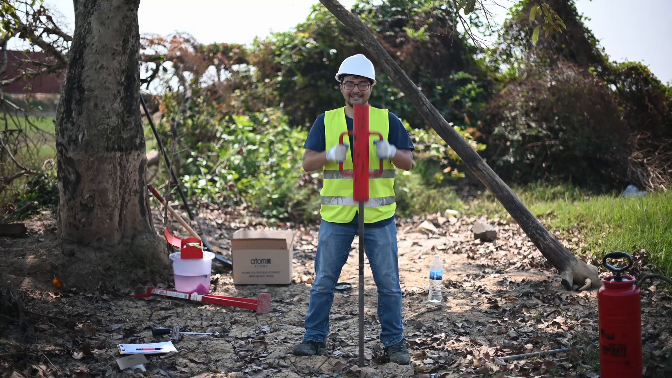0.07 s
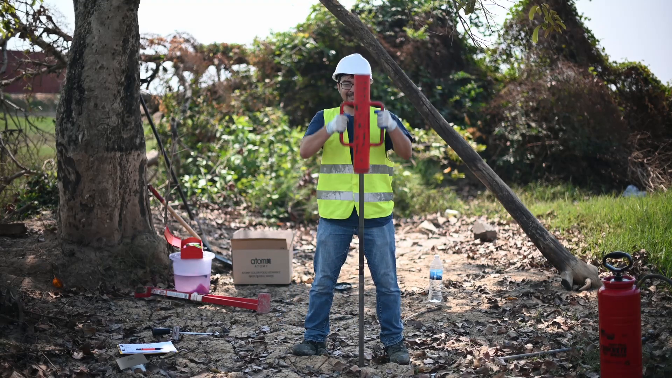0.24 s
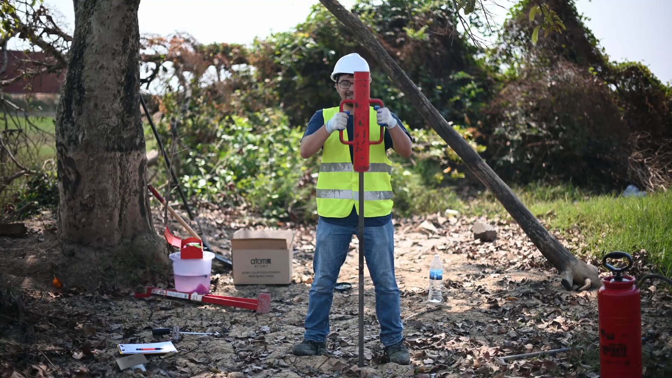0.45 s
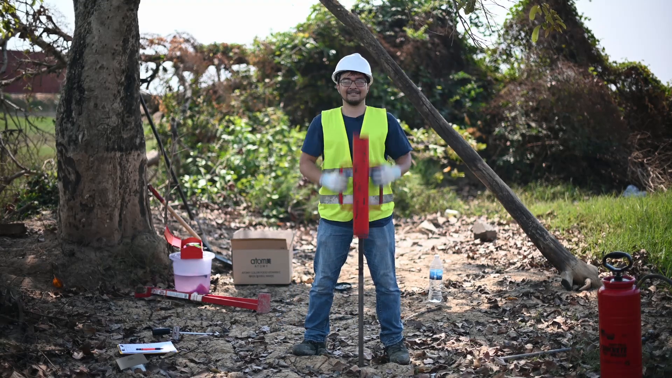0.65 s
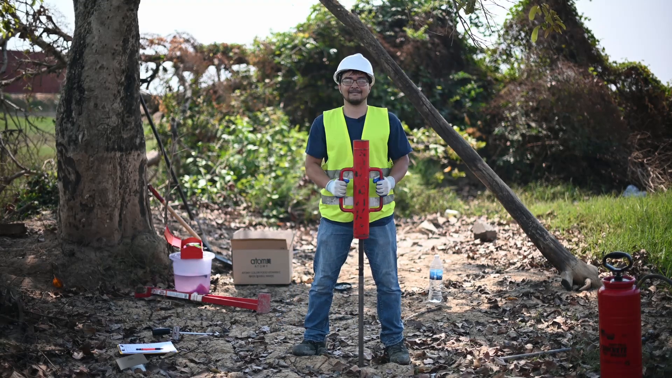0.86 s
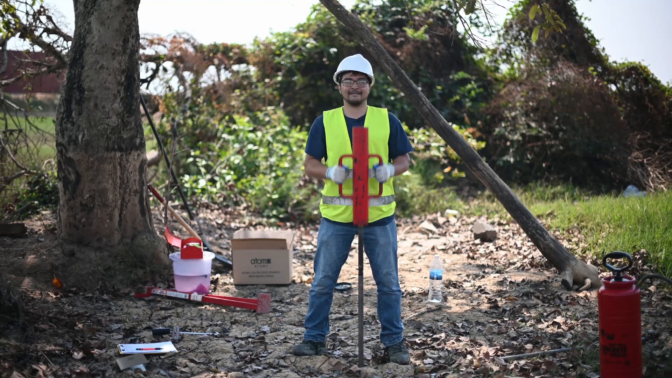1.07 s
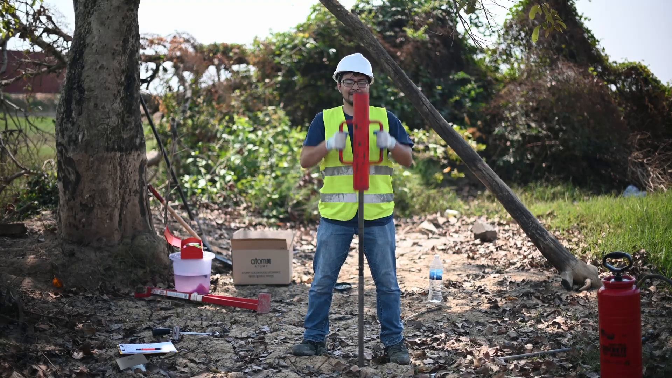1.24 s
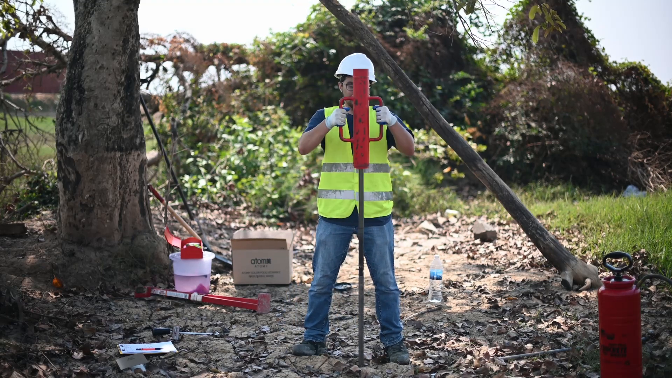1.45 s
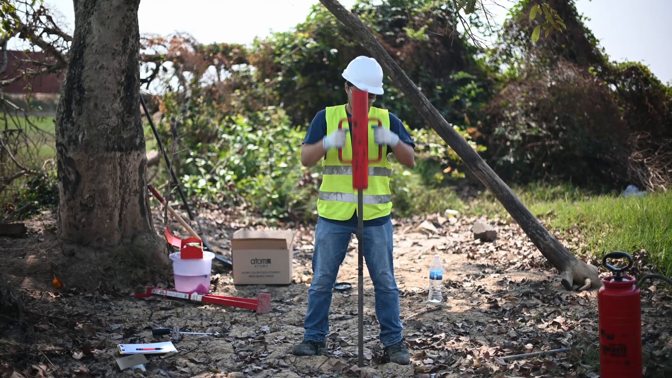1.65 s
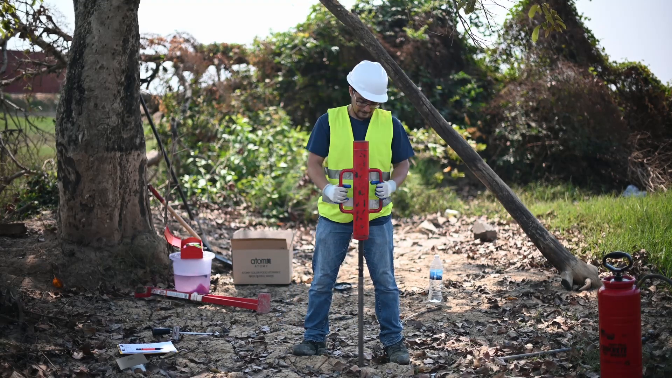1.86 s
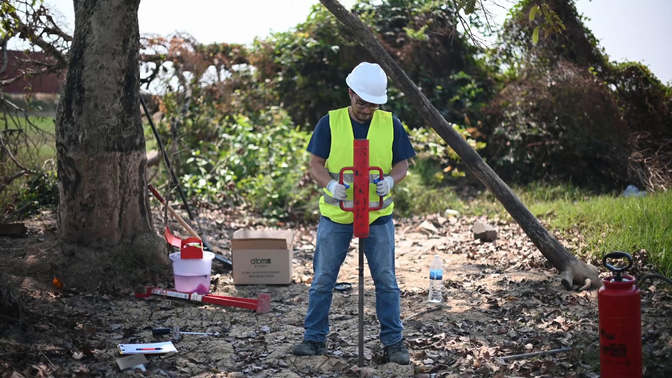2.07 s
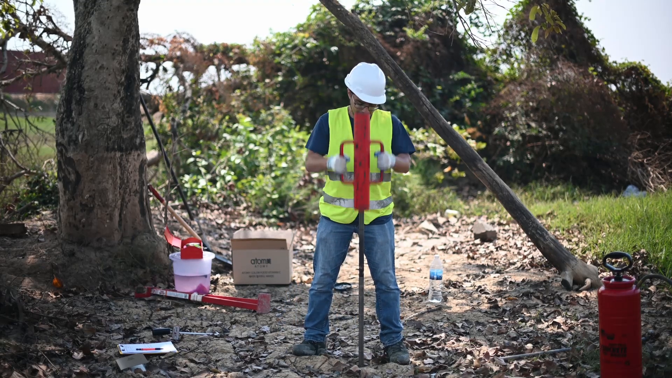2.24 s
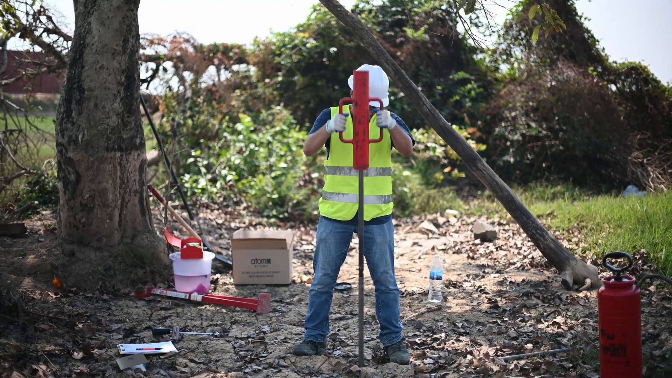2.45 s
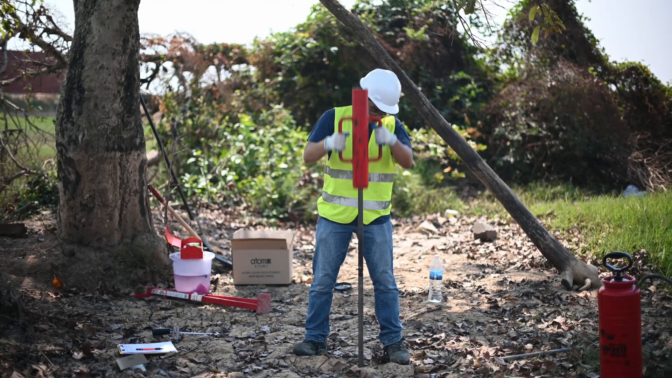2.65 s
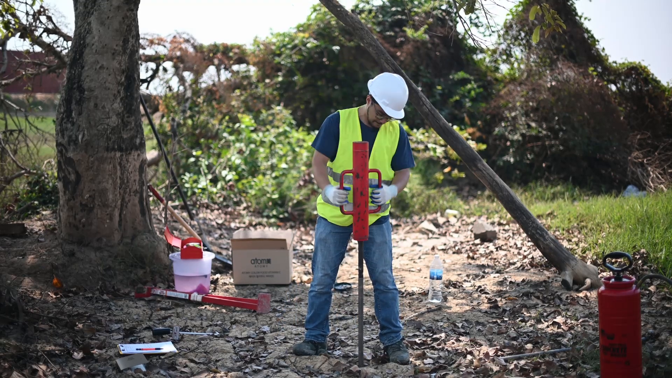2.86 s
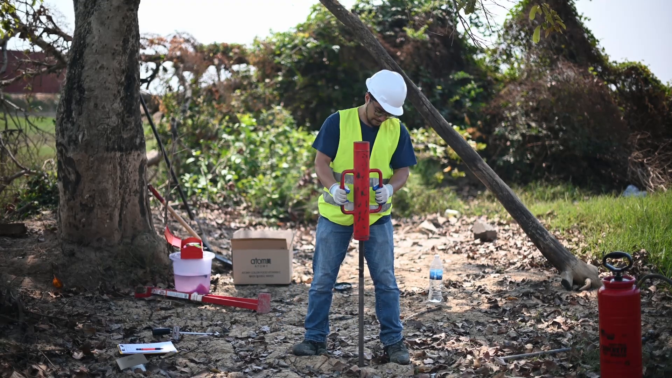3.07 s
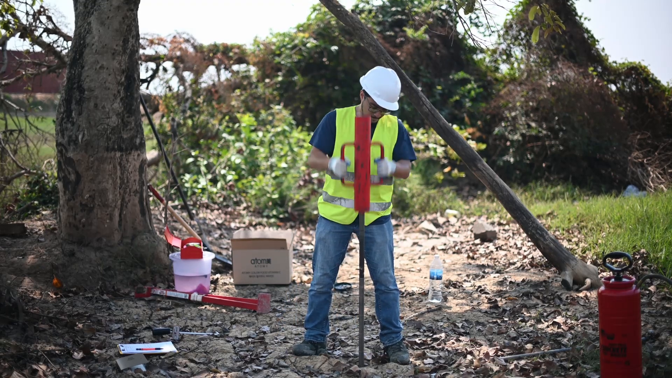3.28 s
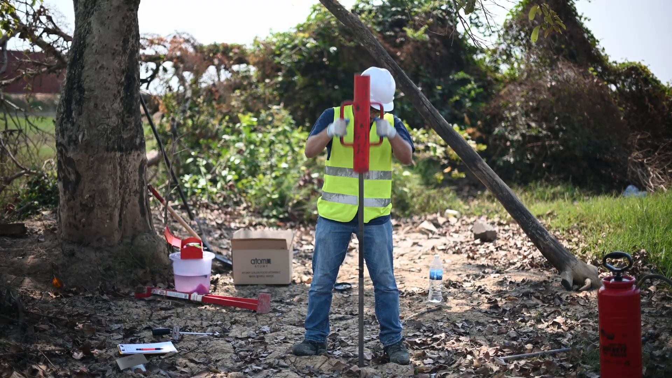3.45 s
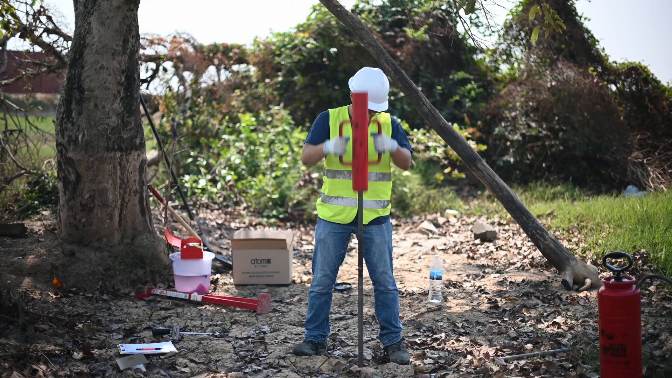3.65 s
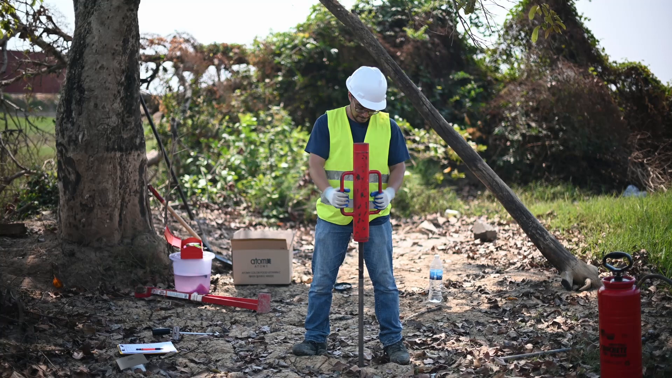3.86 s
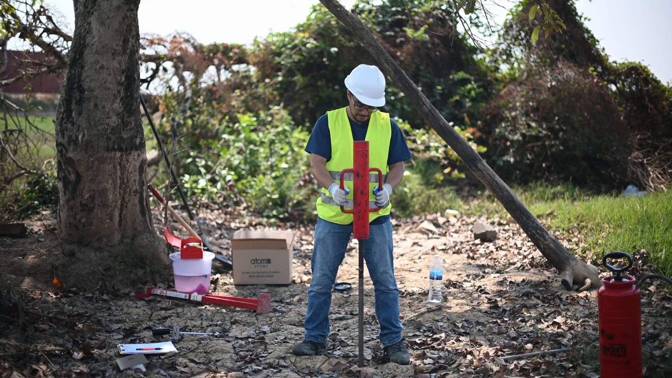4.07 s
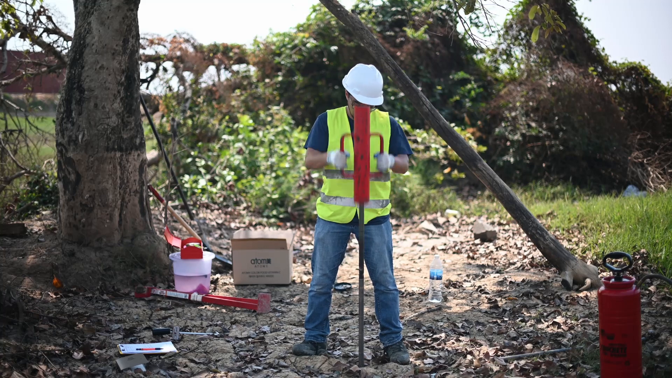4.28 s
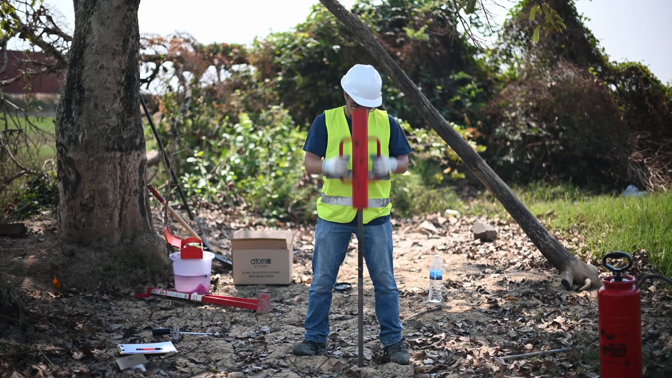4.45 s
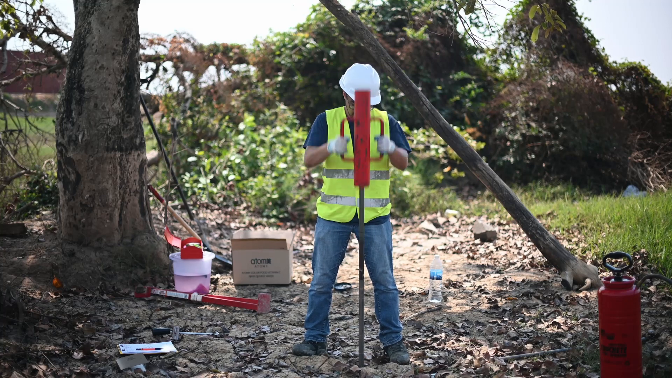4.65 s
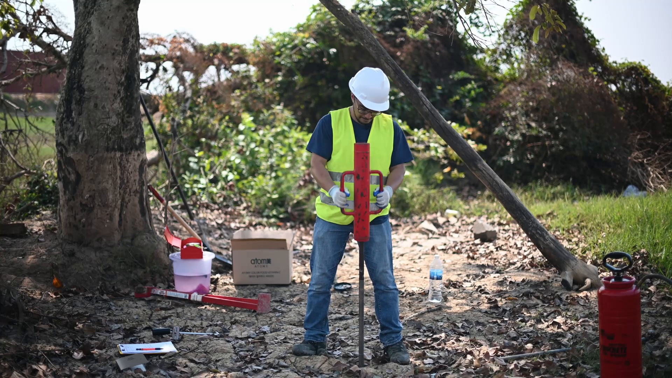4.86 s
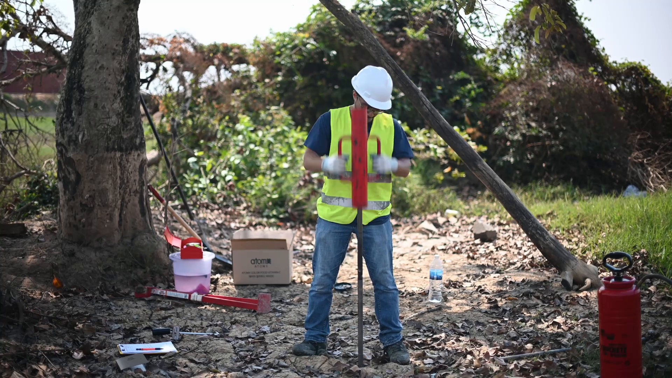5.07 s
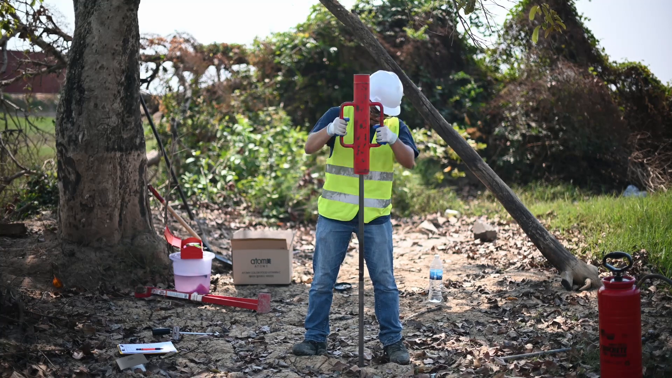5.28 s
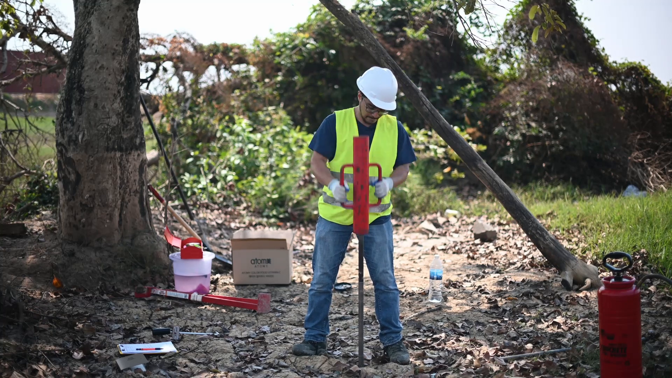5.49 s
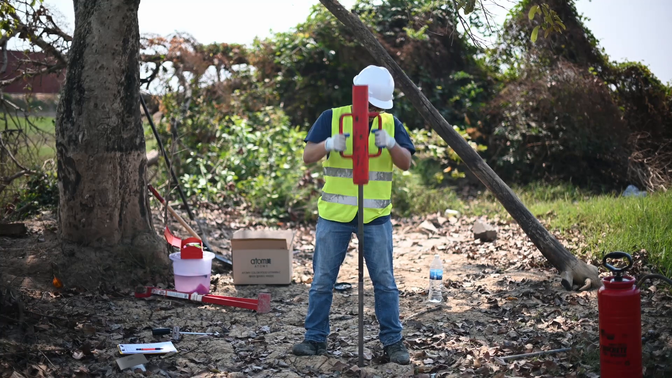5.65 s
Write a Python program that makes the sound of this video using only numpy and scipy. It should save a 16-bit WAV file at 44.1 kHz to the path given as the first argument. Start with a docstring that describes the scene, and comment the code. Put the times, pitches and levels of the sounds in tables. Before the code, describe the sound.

Hard, overloaded metal clangs alternate with softer lift knocks and rattles over faint outdoor wind and leaves, hurrying near the end.

```python
"""Sliding hammer in a leafy yard

A steel hammer is lifted and dropped on a rod; only the left input carries sound.
Each drop is a noise crack and a ringing tube (dying sines) pushed hard into the microphone's limiter.
Each lift ends in a lighter knock; rattles, leaf snaps, wind, sliding steel and rustling leaves fill the rest.
From 4.4 s the blows are sped up: short cross-faded slices of each one overlap."""
import sys
import numpy as np
from scipy import signal
from scipy.io import wavfile
from scipy.ndimage import uniform_filter1d

SR = 44100
rng = np.random.default_rng(int(sys.argv[2]) if len(sys.argv) > 2 else 0)


def persist_wave(psi):
    """Save psi, clipped to +-1, as 16-bit WAV."""
    counts = np.round(np.clip(psi, -1, 1) * 32767).astype(np.int16)
    wavfile.write(sys.argv[1], SR, np.atleast_2d(counts).T)


N = 252252

# All levels are relative, ahead of later gains; t60 is the time to fade by 60 dB, before any scaling.
# pitches of the hammer tube's modes [Hz]
TUBE_HZ = np.array([1655, 1760, 1995, 3020, 3795, 3898, 4613, 5066, 5663, 6410, 6465, 7203, 7508, 8188, 8533, 8739, 8974, 9296, 9342, 10028, 10555, 11150, 11430, 11885, 12005, 12850, 13165, 13742, 13940, 14251, 14800, 15200, 15590, 4625])
# how each of those modes rings: (level on a drop [dB], level on a lift [dB], t60 [s])
TUBE = [(1.5, 3, .14), (-13, -6, 0.21), (-24.5, -17, 0.34), (-28, -24.5, 0.23), (-21, -2.5, 0.2),
        (-4.5, 2.5, 0.14), (-1, -18.5, 0.17), (-9.5, -22.5, 0.13), (-12, -29.5, 0.21), (-20.5, -3, 0.26),
        (-12, -1, 0.2), (-13, -27.5, 0.17), (-6, -8.5, 0.15), (-13.5, -13.5, 0.19), (-16, -22.5, 0.28),
        (-14, -15.5, 0.36), (-3, -21, 0.18), (-39, -20, 0.92), (-1.5, -6.5, 0.19), (-18.5, -7, 0.36),
        (-9.5, -5, 0.27), (-15, -25, .22), (-27.5, -11, 0.37), (-3.5, -28.5, 0.15), (-16, -12, 0.15),
        (-31.5, -18.5, 0.28), (-38.5, -6, 0.37), (-21, -26, 0.27), (-18, -18, 0.093), (-30, -26, .24),
        (-16, -24.5, 0.16), (-15, -19.5, .14), (-14.5, -31, .09), (-54, -55.5, 0.72)]
# the rod bends when the hammer pulls up on it: (pitch [Hz], level [dB], t60 [s])
ROD = [(151.6, 3, 0.31), (516.7, -0.5, 0.28), (980, -6, 0.2), (1510, 2, 0.2), (1836, -21, 0.25)]
# pitches at which each blow sets the strength of its ring [Hz]
RING_REGIONS_HZ = [1655, 1995, 5000, 9000, 14000]
# the hammer lands: (time [s], crack [dB], ring in the five regions [dB] x 5, forerunner [dB],
# sag [0-1], centre of the first slice after the blow [s])
DROPS = [(0.7763, 2.5, -14, -17.5, -5.5, -9.5, -2.5, -34, 0.1, 0),
         (1.9065, -0.5, -12.5, -15.5, -15, -15.5, -9, -37.5, 0.67, 0),
         (2.9247, -2, -13.5, -15, -10.5, -15, -11.5, -39, 1, 0),
         (3.9092, -2, -13, -4.5, -13.5, -9, -14, -35.5, 0.3, 0),
         (4.5464, 18.5, 0, -8, -4.5, -3, -10, -58, 1, 0.00026),
         (4.8578, -8.5, -14, -19, -15.5, -12, -8, -52.5, 0.39, 0.011),
         (5.166, 12, -11, -14, -7, -12.5, -1, -39, 0.35, -0.0054),
         (5.452, 22.5, -3.5, 1, 3, -9, 0, -39.5, 0.36, -0.0054)]
# the hammer reaches the top: (time [s], crack [dB], ring in the five regions [dB] x 5, rod [dB],
# centre of the first slice after the blow [s])
LIFTS = [(0.3818, -40, -34.5, -27.5, -41, -44, -45, -60.5, 0),
         (1.481, -33, -32.5, -45, -59.5, -37, -52, -57.5, 0),
         (2.529, -32.5, -60, -28.5, -36, -38.5, -53, -55, 0),
         (3.5427, -25, -26.5, -16, -23.5, -31.5, -24, -49, 0),
         (4.4298, -32, -18.5, -14, -32, -24.5, -39, -55, -0.011),
         (4.753, -24.5, -19.5, -14, -32.5, -21.5, -35, -50.5, -0.013),
         (5.0446, -38, -29.5, -25.5, -48, -30, -41, -61.5, 0.012),
         (5.347, -21.5, -12, -25, -23.5, -20, -27, -56, -0.0097),
         (5.669, -30.5, -22, -16.5, -34, -27.5, -40, -56, -0.013)]
# tone colour of the crack of a blow: (pitch [Hz], level [dB])
CRACK = [(150, -15), (300, -8), (560, -22.5), (800, 2.5), (1200, -3.5), (1650, 3), (2100, -12), (2550, -2),
         (3300, -7), (7000, -13), (12000, -19), (17000, -22)]
# how long the crack lasts: (pitch [Hz], t60 [s])
CRACK_T60 = [(150, .09), (800, .085), (3000, .065), (7000, .065), (11000, .055), (16000, .045)]
# the anvil clangs briefly under a blow: (pitch [Hz], level [dB], t60 [s])
CLANG = [(303, -14.5, 0.031), (870.8, -4, 0.05), (2471, -3.5, 0.045)]
# the ground under the rod: (pitch [Hz], level [dB])
THUD = [(30, -1.5), (90, 0), (300, -10.5), (800, -6.5), (1500, -42)]
# the loose hammer rattles against the rod: (time [s], level [dB], pitch [Hz], t60 [s])
RATTLES = [(0.409, -33.5, 1460, 0.012), (0.439, -49.5, 1760, 0.031), (0.492, -43.5, 1515, 0.032),
           (0.525, -60, 1700, 0.12), (0.881, -51, 1750, 0.048), (0.959, -44, 1650, 0.018),
           (1.358, -32.5, 1825, 0.014), (2.043, -51, 1700, 0.044), (2.576, -40.5, 1735, 0.032),
           (2.652, -56.5, 2180, 0.029), (3.085, -48, 1655, 0.031), (3.138, -50.5, 1014, .024),
           (3.597, -28, 1680, 0.019), (3.608, -41, 1580, 0.035), (3.645, -44, 1530, 0.032),
           (3.66, -45, 1460, .08), (3.665, -33, 1315, 0.019), (3.699, -37.5, 1520, 0.019),
           (3.761, -39.5, 1980, 0.024), (3.802, -43.5, 1804, 0.028), (4.072, -37.5, 1820, 0.02),
           (4.175, -60.5, 1910, 0.12), (4.466, -33.5, 1630, 0.038), (4.506, -47.5, 1680, 0.068),
           (5.094, -38, 1810, 0.019), (5.128, -56.5, 1620, 0.18), (5.394, -43.5, 1400, 0.14),
           (5.522, -54, 1110, 0.042)]
# two rebounds after each drop at normal speed: (delay after the blow [s], level [dB], t60 [s])
REBOUNDS = [(0.057, -30.5, 0.044), (0.084, -36, 0.051)]
# tone colour of the puff in a rattle: (pitch [Hz], level [dB])
CLACK = [(300, -47.5), (900, 12), (1700, 2), (3200, -6), (6000, -19), (9000, -24.5), (16000, -44.5)]
# dry leaves snap underfoot: (time [s], level [dB])
SNAPS = [(2.46, -45), (2.4815, -36.5), (2.486, -39), (2.492, -40), (2.66, -45), (2.6753, -46.5),
         (3.4975, -34.5)]
# the background's loud start: (time [s], wind [dB], yard and sliding steel [dB])
OPENING = [(0.0, -57, -69), (0.038, -42, -65), (0.172, -51.5, -67), (0.232, -43, -63)]
# the background after that: (time [s], wind [dB], yard and sliding steel [dB])
AIR = [(0.24, -71, -83.5), (0.42, -64, -79.5), (0.68, -60.5, -75.5), (0.93, -56, -80), (1.13, -61, -79),
       (1.4, -63.5, -83.5), (1.66, -59.5, -75), (1.86, -64, -76.5), (2.06, -64, -78.5), (2.26, -61, -78.5),
       (2.47, -70.5, -76), (2.73, -65.5, -70), (2.96, -63.5, -70), (3.14, -69.5, -79), (3.35, -62.5, -75.5),
       (3.81, -65.5, -71.5), (3.95, -75.5, -62), (4.09, -79, -82), (4.27, -78, -89), (4.48, -68.5, -69.5),
       (4.7, -66.5, -76.5), (5.25, -71.5, -74.5), (5.37, -67, -74.5), (5.72, -76, -72.5)]
# leaves rustle in swells: (time of the peak [s], peak level [dB], rise [s], fall [s])
SWELLS = [(0.202, -69, 0.17, 0.026), (0.702, -87, 0.16, 0.15), (1.098, -82, 0.062, 0.063),
          (1.681, -87, 0.16, 0.14), (2.2, -85.5, 0.087, 0.11), (2.482, -75.5, 0.11, 0.16),
          (2.849, -65, 0.16, 0.15), (3.48, -75.5, 0.14, 0.15), (3.85, -73.5, 0.13, 0.035),
          (4.831, -66, 0.068, 0.014), (5.12, -73, 0.11, 0.017), (5.328, -72, 0.04, 0.044),
          (5.418, -70, 0.035, 0.04), (5.66, -74, 0.032, 0.06)]
# tone colours of wind, yard and leaves: (pitch [Hz], level [dB])
WIND = [(7.1, -31), (12, 3), (54, -1), (115, -14), (151, -21.5), (211, -31.5), (300, -28.5), (390, -52),
        (660, -120)]
YARD = [(90, -29), (150, -14), (370, -2.5), (700, -9.5), (1100, -12.5), (1750, -13), (2600, -15),
        (4000, -32.5), (5500, -57)]
RUSTLE = [(1180, -42), (2000, -9.5), (2180, -6.5), (3320, -5.5), (3860, -4), (5410, -6), (10800, -7.5),
          (13100, -9.5), (15000, -18.5)]
# the tube sings faintly as it slides: (pitch [Hz], width [Hz], level [dB])
HUM = [(1510, 210, -1.5), (3120, 72, -8.5), (4840, 30, -26)]

LIMIT, CEILING = 0.075, 0.066  # limiter's running level and its soft clip, before the input gain
MIC_DB, EDGE_HZ = 5, 16000  # input gain, top of the band
SPED_FROM_S, SLICE_S, SPED_DB = 4.4, 0.02, 0.5
LEAD = 2205  # samples kept ahead of each blow
DROP_RING, DROP_SKIP_S, RECOVERY_S = 0.96, 0.05, 0.19  # ring scale, jump per slice, swing back
LIFT_RING, LIFT_SKIP_S = 0.34, 0.019
PARTNER_ABOVE, PARTNER_DB, PARTNER_RING = 0.0095, -9, 0.45  # pitch offset (fraction), level, t60 scale
REBOUND_HZ, RATTLE_TUBE_DB, SNAP_HZ = 1400, -33.5, 5550
HISS_DB = -91  # faint steady hiss under the swells
TICKS_PER_S, TICKS_DB, HUM_DB = 30, -9.5, -8.5  # levels relative to the yard


def gain_of(db):
    """Turns decibels into a gain."""
    return 10 ** (np.asarray(db) / 20)


def read(points, hz):
    """Reads a table between its points, along a log-frequency axis."""
    f, value = np.transpose(points)
    return np.interp(np.log(hz + 1), np.log(f + 1), value)


def add(mix, time_s, sound):
    """Adds a sound at a given time."""
    part = mix[round(time_s * SR):][:len(sound)]
    part += sound[:len(part)]


def noise(n, colour, size, patchy_db=0., t60=None):
    """Random short-time spectra with drifting loud and soft patches; rms 1 before each band decays."""
    hz = np.fft.rfftfreq(size, 1 / SR)
    t = np.arange(4 * n // size + 6) * size / 4 / SR
    real, imaginary, patches = rng.standard_normal((len(t), len(hz), 3)).T
    for axis in (0, 1):
        patches = uniform_filter1d(patches, size=9, axis=axis)
    level_db = read(colour, hz)[:, None] + patchy_db * patches / patches.std()
    spectra = (real + 1j * imaginary) * gain_of(level_db)
    overlap = 3 * size // 4
    rms = signal.istft(spectra, nperseg=size, noverlap=overlap)[1].std()
    if t60 is not None:
        spectra = spectra * gain_of(-60 * t / t60(hz)[:, None])
    return signal.istft(spectra, nperseg=size, noverlap=overlap)[1][:n] / rms


def ring(t, hz, db, t60, spread_db, beat_depth=0., bloom=1e-4, grip=1):
    """Dying sines with chance levels; a twin 5 to 27 Hz off can make each one beat."""
    phase, beat_phase, apart = rng.random((len(hz), 3)).T[..., None]
    worn = t + 0.31 * np.maximum(t - grip, 0)  # once the gloves tighten, the ring dies faster
    start_db = db + spread_db * rng.standard_normal(len(hz))
    level = gain_of(start_db[:, None] - 60 * worn / t60[:, None])
    beat = 1 + beat_depth * np.cos(2 * np.pi * ((5 + 22 * apart) * t + beat_phase))
    sines = np.sin(2 * np.pi * (hz[:, None] * t + phase))
    return (level * beat * sines).sum(0) * (1 - np.exp(-t / bloom))


def air():
    """The background: wind, yard and leaves, the first two following the level tables."""
    t = np.arange(N) / SR
    time_s, *levels = np.concatenate([OPENING, AIR]).T
    wind_level, yard_level = (gain_of(np.interp(t, time_s, db)) for db in levels)
    return wind_level * wind() + yard_level * yard() + leaves(t)


def wind():
    """Lumpy low noise."""
    return noise(N, WIND, size=4096, patchy_db=3.5)


def yard():
    """The patchy wash of the yard, with the hum and ticks of sliding steel."""
    wash = noise(N, YARD, size=512, patchy_db=4.5)
    return wash + gain_of(HUM_DB) * hum() + ticks()


def hum():
    """Noise through narrow resonances of the tube."""
    out = np.zeros(N)
    for hz, width, db in HUM:
        mode = signal.lfilter(*signal.iirpeak(hz, hz / width, SR), rng.standard_normal(N))
        out += gain_of(db) * mode / mode.std()
    return out


def ticks():
    """Chance touches of the sliding hammer, each ringing a few low tube modes for an instant."""
    touched = rng.random(N) < TICKS_PER_S / SR
    size = gain_of(4.0 * np.minimum(rng.exponential(1, N), 3)) * touched
    kind = rng.integers(0, 4, N)
    t = np.arange(2000) / SR
    out = np.zeros(N)
    for k in range(4):
        tap = ring(t, TUBE_HZ[:6], np.zeros(6), np.full(6, 0.035), spread_db=6.0)
        out += signal.oaconvolve(size * (kind == k), tap)[:N]
    return gain_of(TICKS_DB) * out


def leaves(t):
    """Hissing leaves that swell and fade, studded with tiny crackles."""
    rustle = gain_of(HISS_DB)
    for peak_s, db, rise, fall in SWELLS:
        rustle = rustle + gain_of(db) * np.exp(-((t - peak_s) / np.where(t < peak_s, rise, fall)) ** 2)
    crackled = rng.random(N) < 150 / SR  # about 150 a second
    grit = gain_of(3.5 * np.minimum(rng.exponential(1, N), 4)) * crackled
    flicker = 1 + 0.5 * signal.lfilter([1], [1, -.97], grit)
    hiss = noise(N, RUSTLE, size=256, patchy_db=3.0)
    return rustle * hiss * flicker / np.sqrt(np.mean(flicker ** 2))


def strike(t, crack_db, mode_db, lasting, crack_lasting):
    """A crack, tube modes and anvil clang mixed, then squeezed by the limiter."""
    tube_t60 = lasting * np.transpose(TUBE)[2]
    crack = noise(len(t), CRACK, size=128, t60=lambda f: crack_lasting * read(CRACK_T60, f))
    tube = ring(t, TUBE_HZ, mode_db, tube_t60, spread_db=3.5, beat_depth=0.51, bloom=0.0042,
                grip=0.11 * lasting)
    # every tube mode has a short-lived partner just above it
    partners = ring(t, TUBE_HZ * (1 + PARTNER_ABOVE), mode_db + PARTNER_DB, PARTNER_RING * tube_t60,
                    spread_db=11.0, beat_depth=0.5, bloom=0.018)
    hz, db, t60 = np.transpose(CLANG)
    clang = ring(t, hz, db + crack_db, crack_lasting * t60, spread_db=3.5, beat_depth=0.73, bloom=0.00074)
    return limiter(gain_of(crack_db) * crack + tube + partners + clang)


def limiter(sound):
    """Turns loud sound down after a short lag; the first peaks slip past and are clipped softly."""
    keep = np.exp(-1 / (0.0049 * SR))
    power = signal.lfilter([1 - keep], [1, -keep], sound ** 2)
    level = sound / np.sqrt(1 + power / LIMIT ** 2) / CEILING
    return CEILING * level / (1 + level ** 4) ** .25


def lift(time_s, crack_db, *rest):
    """The hammer knocks at the top of its stroke, damped by the gloves, and shakes the rod."""
    *ring_db, rod_db, centre = rest
    t = np.arange(round(.35 * SR)) / SR
    mode_db = np.transpose(TUBE)[1] + read(list(zip(RING_REGIONS_HZ, ring_db)), TUBE_HZ)
    knock = strike(t, crack_db, mode_db, LIFT_RING, crack_lasting=0.83)
    hz, db, t60 = np.transpose(ROD)
    rod = ring(t, hz, db + rod_db, t60, spread_db=7.5) * np.clip(t / 0.00064, 0, 1)
    return hurried(time_s, np.concatenate([np.zeros(LEAD), knock + rod]), centre, LIFT_SKIP_S)


def rattle(time_s, db, hz, t60):
    """A short clack of two close modes in a puff of noise; the tube rings faintly with it."""
    t = np.arange(round(.12 * SR)) / SR
    body = ring(t, hz * np.array([.9, 1.08]), np.array([-6., -6.]), np.array([t60, t60]), spread_db=3.5)
    puff = 0.37 * noise(len(t), CLACK, size=64) * gain_of(-60 * t / (1.25 * t60))
    _, lift_db, tube_t60 = np.transpose(TUBE)
    tube = ring(t, TUBE_HZ, lift_db + RATTLE_TUBE_DB, 0.34 * np.minimum(tube_t60, .3), spread_db=7.0)
    return time_s, gain_of(db) * (body + puff + tube) * np.clip(t / 0.0027, 0, 1)


def drop(time_s, crack_db, *rest):
    """The hammer lands: a forerunner through the ground, then the blow with a thud and a sag."""
    *ring_db, fore_db, sag, centre = rest
    t = np.arange(round(.7 * SR)) / SR
    mode_db = np.transpose(TUBE)[0] + read(list(zip(RING_REGIONS_HZ, ring_db)), TUBE_HZ)
    blow = strike(t, crack_db, mode_db, DROP_RING, crack_lasting=0.9)
    thud = gain_of(-35.5 - 60 * t / 0.083) * noise(len(t), THUD, size=1024)
    blow = blow + thud * np.clip(t / 0.0039, 0, 1)
    blow = sagging(blow, sag) * np.clip((t[-1] - t) / 0.13, 0, 1)
    fore = gain_of(fore_db) * forerunner()
    sound = np.concatenate([np.zeros(LEAD - len(fore)), fore, blow])
    return hurried(time_s, sound, centre, DROP_SKIP_S)


def forerunner():
    """A faint rising sweep and noise that come through the ground ahead of the air."""
    t = np.arange(round(.0105 * SR)) / SR
    sweep = np.sin(2 * np.pi * np.cumsum(450 + 70000 * t) / SR) * gain_of(-60 * t / 0.1)
    return (sweep + 0.67 * noise(len(t), CRACK, size=64)) * np.clip(t / 0.005, 0, 1)


def sagging(blow, sag):
    """Lopsided overload pulls the resting level down; the coupling capacitor swings it back."""
    lag = np.exp(-1 / (.016 * SR))
    leak = np.exp(-1 / (RECOVERY_S * SR))
    pull = -np.clip(sag, 0, 1) * signal.lfilter([1 - lag], [1, -lag], abs(blow))
    return blow + signal.lfilter([1, -1], [1, -leak], pull)


def snap(time_s, db):
    """A leaf snaps: a click of two or three cycles."""
    t = np.arange(200) / SR
    fading = gain_of(db - 60 * t * SNAP_HZ / 6)  # 60 dB down in six cycles
    return time_s, fading * np.sin(2 * np.pi * SNAP_HZ * t)


def hurried(time_s, sound, centre, skip):
    """Speeds up late blows with overlapping cosine slices, each taken further on in the sound."""
    start_s = time_s - LEAD / SR  # the blow comes LEAD samples in
    if time_s < SPED_FROM_S:
        return start_s, sound
    n = np.arange(len(sound))
    out = np.zeros(len(sound))
    for k in range(-1, 9):
        place = ((n - LEAD) / SR - centre) / SLICE_S - k
        window = np.cos(np.pi / 2 * np.clip(place, -1, 1)) ** 2
        source = np.clip(n + round(max(k, 0) * skip * SR), 0, len(n) - 1)
        out += window * sound[source]
    return start_s, gain_of(SPED_DB) * out


def scene():
    """Every event over the background; the right input is silent."""
    left = air()
    rebounds = []
    for time_s, *_ in DROPS:
        if time_s < SPED_FROM_S:
            rebounds += [(time_s + late, db, REBOUND_HZ, t60) for late, db, t60 in REBOUNDS]
    sources = ((lift, LIFTS), (rattle, RATTLES), (drop, DROPS), (rattle, rebounds), (snap, SNAPS))
    for source, table in sources:
        for row in table:
            add(left, *source(*row))
    return np.array([left, np.zeros(N)])


def record(dry):
    """Applies the input gain, then cuts the treble above the band edge."""
    band_limit = signal.firwin(255, EDGE_HZ, window=("kaiser", 9), fs=SR)
    return signal.oaconvolve(gain_of(MIC_DB) * dry, band_limit[None], "same")


dry = scene()
out = record(dry)
persist_wave(out)
```